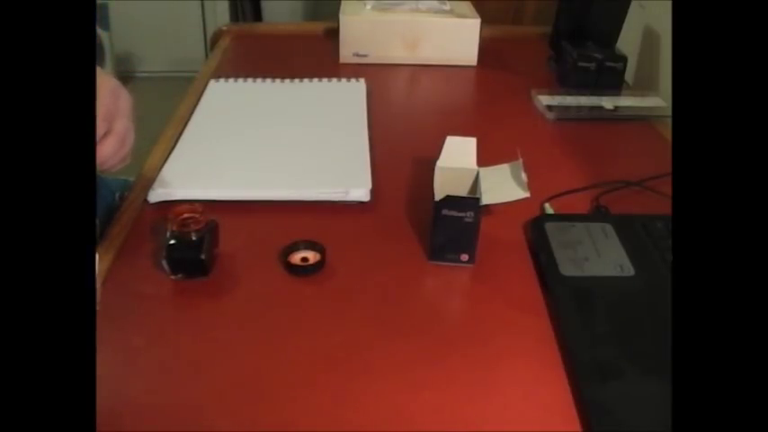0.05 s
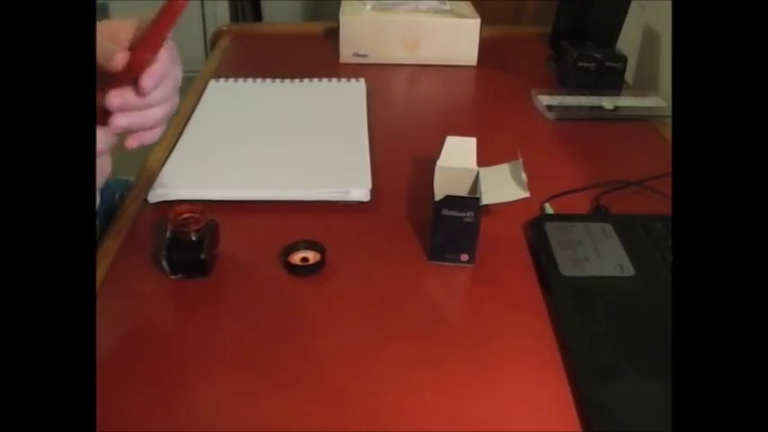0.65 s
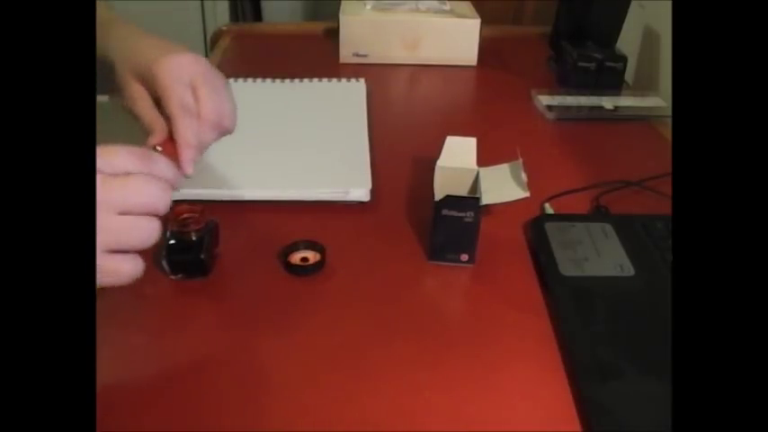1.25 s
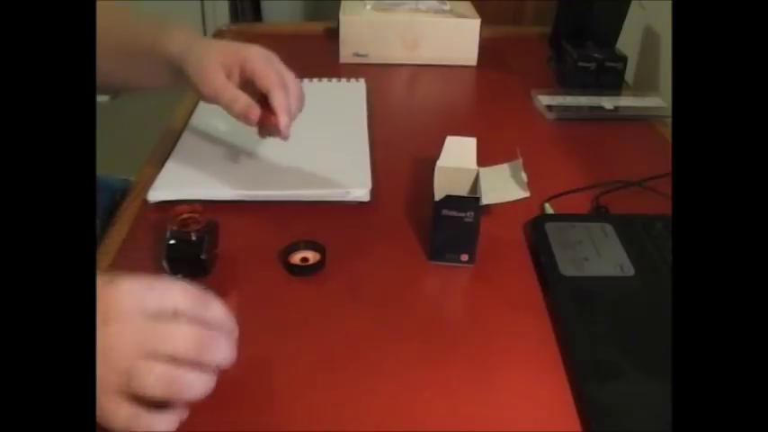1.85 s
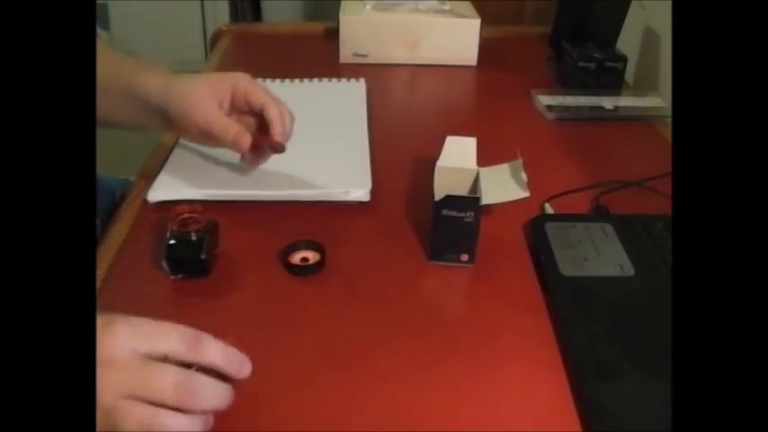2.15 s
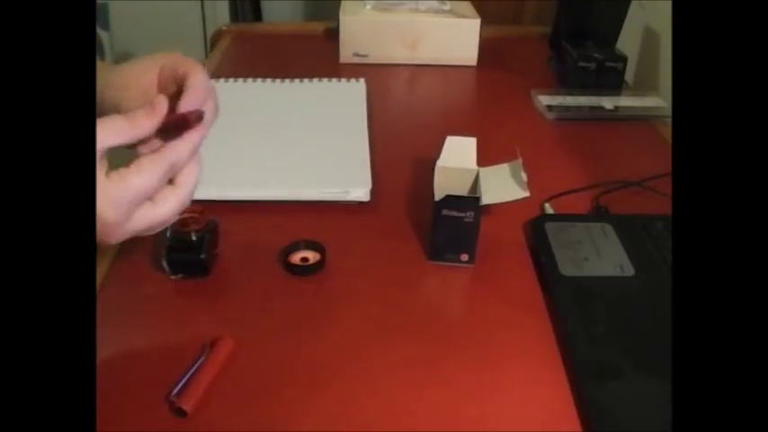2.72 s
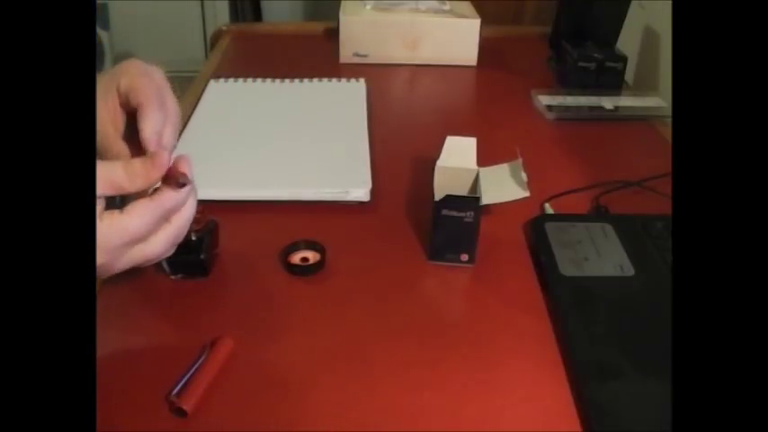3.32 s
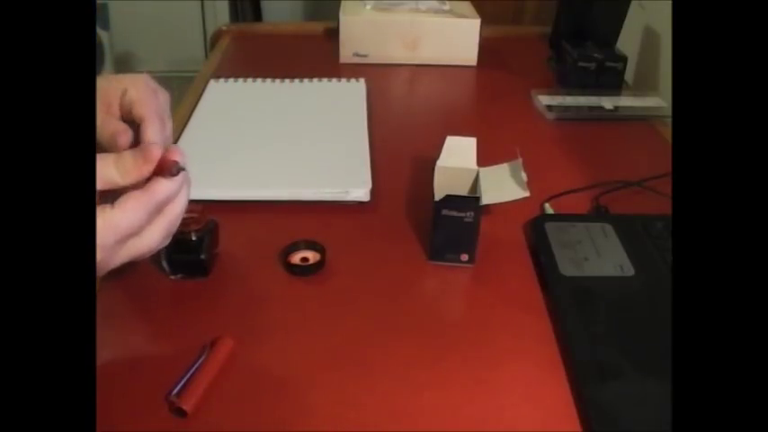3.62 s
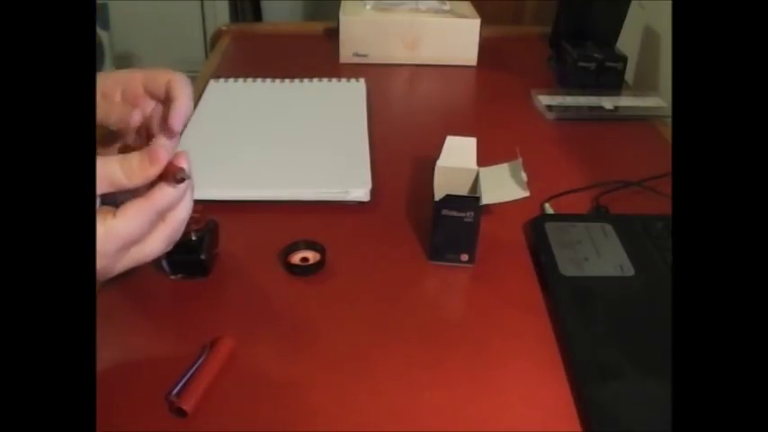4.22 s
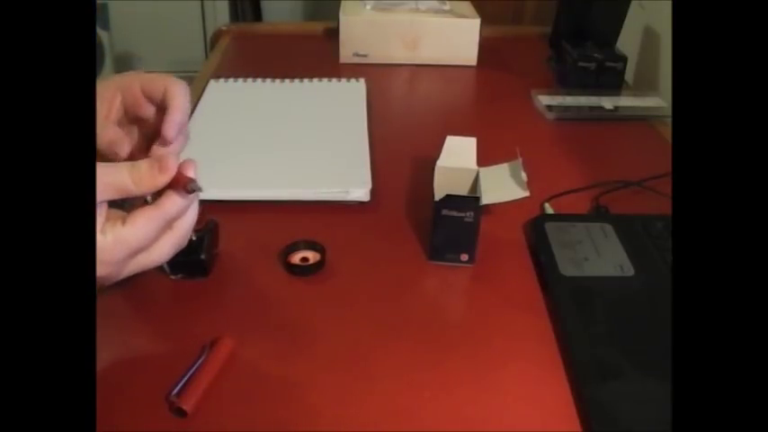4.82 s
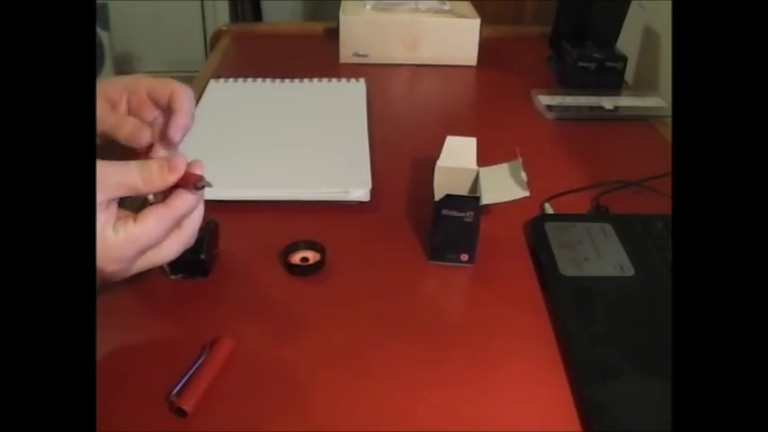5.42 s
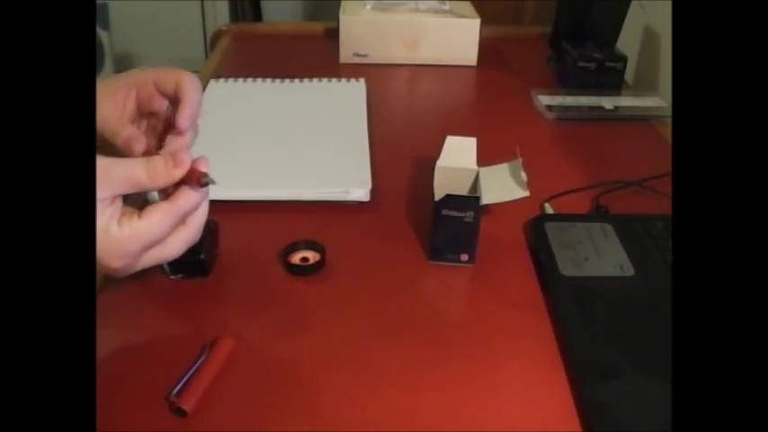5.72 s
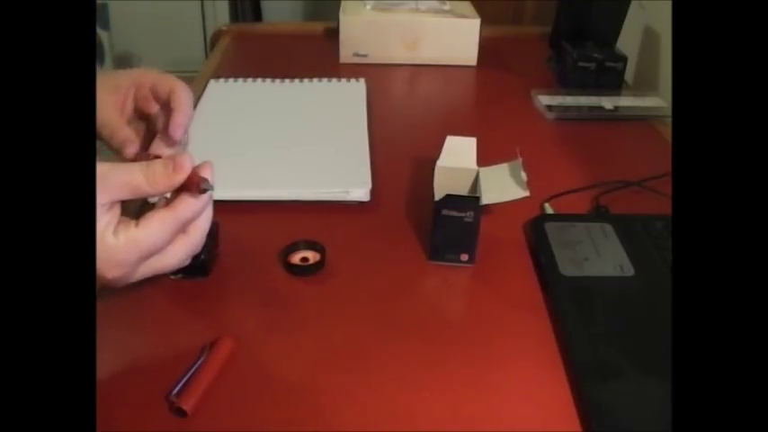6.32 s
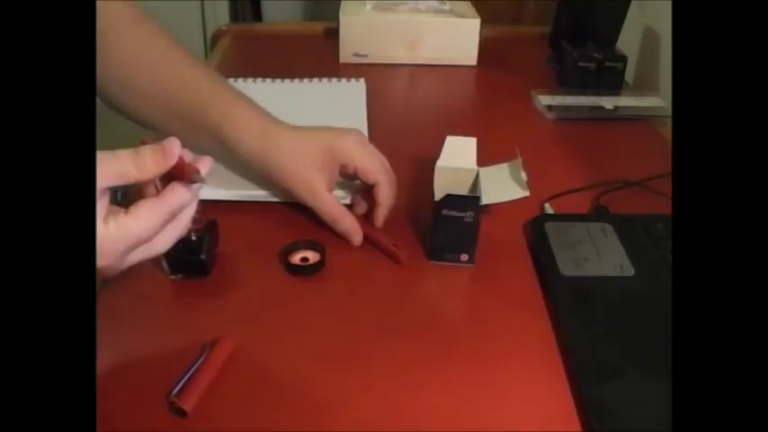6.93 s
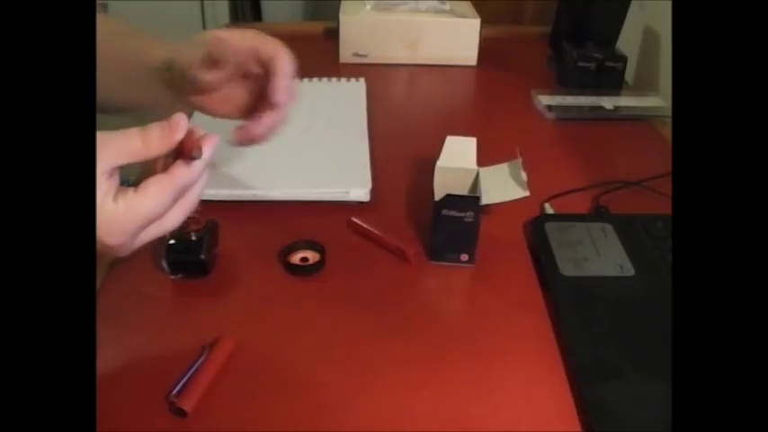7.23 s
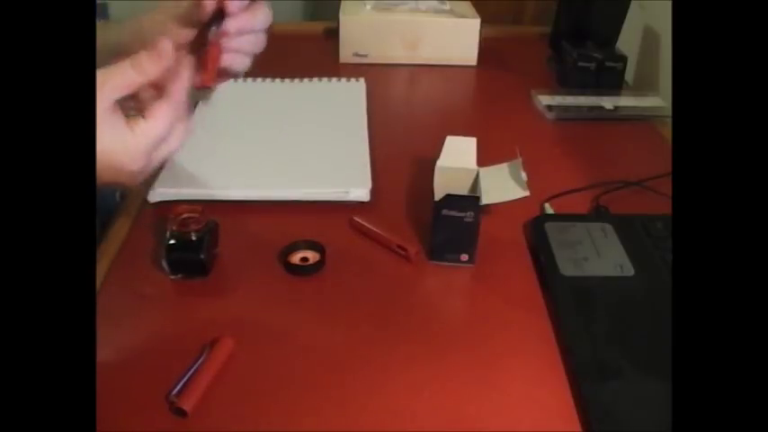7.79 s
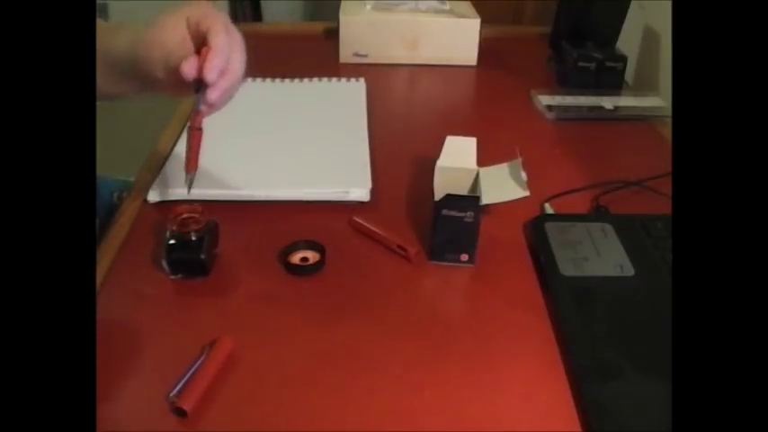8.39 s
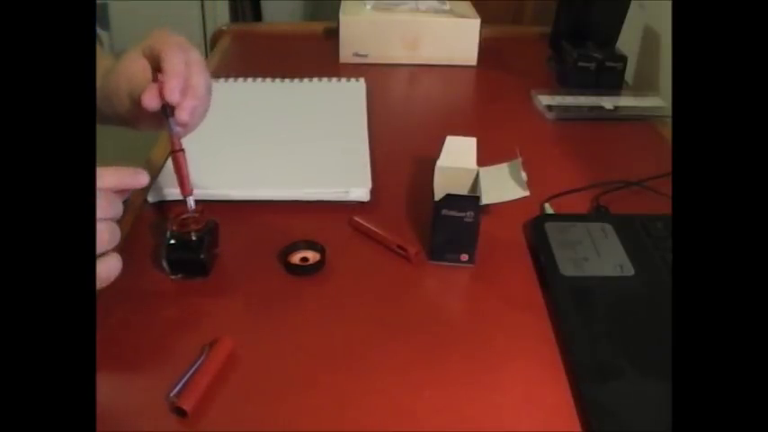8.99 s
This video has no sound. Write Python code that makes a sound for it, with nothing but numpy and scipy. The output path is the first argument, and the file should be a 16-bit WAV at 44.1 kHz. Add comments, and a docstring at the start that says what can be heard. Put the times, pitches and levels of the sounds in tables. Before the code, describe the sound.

Over a humming fan, a plastic pen snaps open, its parts ticking, rasping faintly and knocking down onto a wooden desk.

```python
"""A fan's rushing air and mains hum fill a small, dry room; a fountain pen ticks faintly in the fingers.
Its cap snaps off with a crack and a hollow pop, then clatters onto a wooden desk.
The barrel is unscrewed: the thread sticks and slips, and the filler's small parts tick and ring.
The barrel knocks down on the desk too. Hand and sleeve brush, and fingers and wrist bump the wood."""
import sys
import numpy as np
from scipy import signal
from scipy.fft import rfft, irfft, next_fast_len
from scipy.io import wavfile
from scipy.ndimage import uniform_filter1d

SR = 44100
rng = np.random.default_rng(int(sys.argv[2]) if len(sys.argv) > 2 else 0)


def log_audio(samples):
    """Write samples as a 16-bit WAV file to the path given in sys.argv[1]."""
    # one column per channel
    frames = np.atleast_2d(samples).T
    # limit to full scale, then quantise
    limited = np.clip(frames, -1, 1)
    pcm = np.round(limited * 32767).astype(np.int16)
    wavfile.write(sys.argv[1], SR, pcm)


N = 403495
T = np.arange(N) / SR
RING_T = T[:SR // 2]


def undb(db):
    """Decibels to gain."""
    return 10 ** (np.asarray(db) / 20)


def level(x, db):
    """Scale to an rms level."""
    return x * undb(db) / np.sqrt(np.mean(x ** 2))


def add(track, at_s, sound):
    """Mix a sound in at a time."""
    i = int(at_s * SR)
    track[i:i + len(sound)] += sound[:N - i]


def colour(x, points):
    """Minimum-phase filter through (frequency [Hz], gain [dB]) points."""
    size = next_fast_len(len(x) + 2048) * 2
    hz, db = np.transpose(points)
    log_hz = np.log(np.fft.rfftfreq(size, 1 / SR) + 1)
    log_gain = np.log(undb(np.interp(log_hz, np.log(hz), db)))
    cepstrum = irfft(log_gain)[:size // 2]
    response = np.exp(2 * rfft(cepstrum, size) - cepstrum[0])
    return irfft(rfft(x, size) * response)[:len(x)]


def band(x, hz, width_hz):
    """Steep resonance: a band-pass applied twice."""
    b, a = signal.iirpeak(hz, hz / width_hz, fs=SR)
    return signal.lfilter(b, a, signal.lfilter(b, a, x))


def drift(rate_hz):
    """Slow random curve, spread near 1."""
    step = int(SR / rate_hz)
    return uniform_filter1d(np.repeat(rng.standard_normal(N // step + 1), step), step)[:N]


def ring(modes, pitch=1, order=1):
    """One blow on a body; at order 2 each mode swells briefly first, like air driven by a wall."""
    hz, db, t60_s = np.transpose(modes)[:, :, None]
    decay = np.log(1000) / t60_s
    t = RING_T[:SR // 6]
    envelope = 2 * decay / SR * (decay * t) ** (order - 1) * np.exp(-decay * t)
    return np.sum(undb(db) * envelope * np.cos(2 * np.pi * hz * pitch * t), axis=0)


def crack(decay_ms, spike=0.41):
    """Hard surfaces touch: a spike, then brief pitchless chatter; unit energy."""
    t = RING_T[:1024]
    burst = rng.standard_normal(len(t)) * np.exp(-t / (decay_ms / 1000))
    burst[0] = spike
    power = uniform_filter1d(np.abs(rfft(burst)) ** 2, size=7)
    whitening = np.c_[np.fft.rfftfreq(len(t), 1 / SR) + 1, -10 * np.log10(power)]
    burst = colour(burst, whitening)
    return burst / np.linalg.norm(burst)


# wall reflections: (frequency [Hz], gain [dB])
WALL_EQ = [(100, -5), (250, 6), (295, -1.5), (400, -12), (560, -5), (1000, -6), (1600, -11), (2200, -7.5),
           (4000, -1), (8000, -6), (11500, -6), (16000, -5)]

def diffuse(t60_s, build_s, treble_db, smooth_hz=90):
    """Many weak reflections build up and die away, coloured by the walls."""
    tail = rng.standard_normal(len(RING_T)) * undb(-60 * RING_T / t60_s)
    spectrum = rfft(tail * np.minimum(RING_T / build_s, 1) ** 2, SR)
    power = uniform_filter1d(np.abs(spectrum) ** 2, smooth_hz)
    flat = irfft(spectrum / np.sqrt(power), SR)[:len(RING_T)]
    return colour(colour(flat, WALL_EQ), [(2000, 0), (5000, treble_db)])


def room(x, echoes, wet_db, build_s, t60_s=0.235, left_db=6.5, treble_db=0, side_db=-8):
    """Direct sound with its treble leaning left, echoes off near surfaces and a short diffuse tail."""
    mid, side = (signal.fftconvolve(x, diffuse(t60_s, build_s, treble_db))[:N] for _ in range(2))
    side = undb(side_db) * side
    for delay_s, db in echoes:
        add(mid, delay_s, undb(db) * x)
    direct = np.array([colour(x, [(500, -ear * 0.45), (2500, ear * 0.082), (11000, ear * left_db / 2)])
                       for ear in (1, -1)])
    return direct + undb(wet_db) * np.array([mid + side, mid - side])


# fan air, and further shaping of its side channel: (frequency [Hz], gain [dB])
AIR_EQ = [(100, -55.5), (170, -12), (222, -5), (253, -8.5), (370, -6.5), (718, -3), (775, -3.5), (1320, -6),
          (1480, -9.5), (2120, -11.5), (2870, -28), (7830, -27), (8950, -27), (12800, -25.5),
          (15800, -31.5)]
AIR_SIDE_EQ = [(60, 2), (110, -5), (200, 4.5), (380, 3.5), (700, -1), (1290, -1), (2380, 0.5), (4400, 6),
               (8120, -0.5), (15000, 0)]
# fan housing: (centre [Hz], width [Hz], level [dB], side re mid [dB])
HOUSING_BANDS = [(45, 63, -72, 1), (139, 36, -66.5, -6), (713.3, 26, -71, -3), (4240, 4600, -73.5, 0)]
# motor, mains and electronic tones: (frequency [Hz], level [dB])
HUM_TONES = [(50, -89), (90.3, -58.5), (150, -74), (250, -73), (1223, -76.5), (1354.5, -74), (8000, -86),
             (10800, -84)]

def fan(air_db=-59.5, right_db=0.34, hum_right_db=3.0):
    """Rushing air, a droning housing and slightly unsteady tones, all a little to the right."""
    mid, side = (level(colour(rng.standard_normal(N), AIR_EQ), air_db) for _ in range(2))
    side = colour(side, AIR_SIDE_EQ)
    for hz, width_hz, db, side_db in HOUSING_BANDS:
        mid += level(band(rng.standard_normal(N), hz, width_hz), db)
        side += level(band(rng.standard_normal(N), hz, width_hz), db + side_db)
    hum = np.zeros(N)
    for hz, db in HUM_TONES:
        tone = np.sin(2 * np.pi * hz * T + 0.15 * drift(4))
        hum += level(tone, db) * undb(0.7 * drift(6))
    lean = np.array([[-0.5], [0.5]])
    return np.array([mid + side, mid - side]) * undb(right_db * lean) + hum * undb(hum_right_db * lean)


# hand and sleeve: (start [s], length [s], centre [Hz], level [dB])
SLEEVE_BRUSHES = [(1.66, 0.17, 424, -59), (7.88, 0.4, 464, -57)]

def brushes(relative_width=0.34, flutter_db=3):
    """Skin and cloth rub in soft, uneven swells."""
    out = np.zeros(N)
    for start_s, length_s, hz, db in SLEEVE_BRUSHES:
        swell = np.hanning(int(length_s * SR))
        rub = level(band(rng.standard_normal(SR), hz, hz * relative_width), db)
        add(out, start_s, swell * rub[:len(swell)])
    return out * undb(flutter_db * drift(21))


# wooden desk and hollow pen tube, also struck in knocks(): (frequency [Hz], level [dB], t60 [s])
DESK_MODES = [(134, -8.5, 0.062), (426, 1, 0.049), (497, -1.5, 0.038), (550, 2, 0.054), (618, -11.5, 0.075)]
TUBE_MODES = [(1035, -3, 0.024), (1315, -0.5, 0.0064), (1546, 5.5, 0.0067), (2057, -3.5, 0.018),
              (3900, -32, 0.0016), (6100, -14.5, 0.003)]
# fingers and wrist on the desk: (time [s], level [dB], contact [ms], pen re desk [dB])
HAND_BUMPS = [(6.957, 21, 8.7, -25), (7.003, 9.5, 3.9, -25), (7.12, 13, 3.5, -22), (8.786, -1, 1.35, 1),
              (8.803, 9, 3.5, -11)]

def bumps():
    """Flesh pushes slowly, so mostly the desk's low modes answer; a quicker push also knocks the pen."""
    out = np.zeros(N)
    for at_s, db, contact_ms, pen_db in HAND_BUMPS:
        push = np.hanning(int(contact_ms * SR / 1000) + 3)
        response = ring(DESK_MODES) + undb(pen_db) * ring(TUBE_MODES, order=2)
        add(out, at_s, undb(db) * signal.fftconvolve(push / push.sum(), response))
    return out


# thread rasp and rub through the barrel: (frequency [Hz], gain [dB])
RASP_EQ = [(1000, -9), (5600, -4), (7200, -0.5), (8200, -3), (9200, 1), (10300, 0), (12100, 0.5),
           (14200, -2), (16000, -14)]
RUB_EQ = [(500, -18), (1050, 5.5), (2000, -0.5), (2600, -7), (3150, -2.5), (4200, -19), (16000, -36)]
# barrel turns: (start [s], length [s], rasp [dB], rub [dB], squeak [Hz], squeak [dB])
TURNS = [(3.942, 0.057, -62, -56, 7240, -86), (4.213, 0.12, -62.5, -62, 11800, -68),
         (4.534, 0.057, -64.5, -61, 8800, -73), (4.866, 0.078, -65, -67, 12400, -73),
         (5.797, 0.074, -66.5, -66, 9000, -81), (6.086, 0.19, -67.5, -70, 11800, -81),
         (6.3, 0.236, -66, -65, 10500, -72), (6.411, 0.032, -64, -72, 9200, -62),
         (6.948, 0.08, -68, -72, 13000, -77)]

def scrapes(slips_per_s=380, spread_db=4, squeak_width_hz=2600):
    """The thread sticks and slips in uneven grains: a crisp rasp, a hollow rub and a squeak."""
    out = np.zeros(N)
    n = len(RING_T)
    for start_s, length_s, rasp_db, rub_db, squeak_hz, squeak_db in TURNS:
        pressure = signal.windows.tukey(int(length_s * SR))
        slips = rng.random(n) < slips_per_s / SR
        sizes = rng.choice([-1, 1], n) * undb(spread_db * rng.standard_normal(n))
        grains = (slips * sizes)[:len(pressure)]
        rasp = level(colour(grains, RASP_EQ), rasp_db)
        rub = level(colour(grains, RUB_EQ), rub_db)
        squeak = level(band(grains, squeak_hz, squeak_width_hz), squeak_db)
        add(out, start_s, pressure * (rasp + rub + squeak))
    return out


# filler parts: (frequency [Hz], level [dB], t60 [s])
FILLER_MODES = [(1110, -1, 0.019), (2310, -2, 0.018), (3090, -7, 0.02), (5100, -1, 0.018),
                (7040, 2.5, 0.017), (9030, -1, 0.016), (10850, 1, 0.015), (12140, -0.5, 0.011)]
# tiny contacts through the plastic body: (frequency [Hz], gain [dB])
CHATTER_EQ = [(400, -14), (1120, 6.5), (1550, 1.5), (2250, 3.5), (2750, -4.5), (3250, 1), (4000, -4.5),
              (5000, -3.5), (6000, -4), (7100, -2.5), (8200, -3.5), (9300, -8), (12200, -1.5), (14000, -10),
              (16000, -18)]
# filler catches: (time [s], click [dB], ping [Hz], ping [dB], click tilt [dB/octave])
FILLER_TICKS = [(0.0954, -48, 1910, -15, -6), (0.4956, -46.5, 9550, -19, 1.5),
                (0.558, -48, 12200, -34, -0.5), (1.712, -43, 2200, -23, -2), (2.5127, -34.5, 1900, -5, 2),
                (3.8701, -49, 11600, -35, 2), (3.899, -54, 12000, -24, 7), (3.971, -51, 3200, -27, -2),
                (4.244, -39.5, 7100, -20, -3), (4.26, -35, 9500, -12, 2), (4.2805, -39, 12800, -16, 5),
                (4.2889, -36.5, 7340, -12, 2), (4.316, -50, 7100, -20, 0), (4.518, -38.5, 12500, -9, 0),
                (4.8358, -35, 2280, -15, 5.5), (4.895, -43, 1130, -12, -2), (4.9184, -42, 7000, -24, 2),
                (4.963, -53, 7100, -22, -3), (5.1464, -30, 3270, -11, 0), (5.16, -46, 4970, -22, 4),
                (5.2295, -51, 3280, -24, 4), (5.7354, -52, 3200, -23, -1), (5.8194, -41, 3210, -19, 0),
                (5.917, -50, 8900, -33, 4), (6.0764, -37, 11600, -20, 0), (6.209, -34.5, 9200, -24, 0),
                (6.232, -40, 10000, -20, -2), (6.2776, -28.5, 11500, -1.5, 2), (6.344, -47, 2930, -17, -5),
                (6.3812, -38, 3020, -10.5, 2), (6.467, -34, 3090, -7, 2.5), (6.955, -47, 3430, -23, -4),
                (7.007, -30.5, 9100, -17, -2), (7.552, -41.5, 2300, -27, -2.5)]

def ticks(click_gain_db=13, ping_t60_s=0.012, settle_range_s=(0.012, 0.027), settle_db=-17.5):
    """Small, stiff parts click, then settle more faintly; the contact point picks a resonance to ping."""
    out = np.zeros(N)
    for at_s, db, ping_hz, ping_db, tilt in FILLER_TICKS:
        settle_s = at_s + rng.uniform(*settle_range_s)
        for click_s, drop_db in (at_s, 0), (settle_s, settle_db):
            click = ring(FILLER_MODES, pitch=rng.uniform(0.97, 1.03))  # shifting grip detunes
            add(click, 0, colour(crack(decay_ms=3.4), CHATTER_EQ))
            click = colour(click, [(1000, -2 * tilt), (16000, 2 * tilt)])
            add(out, click_s, undb(db + click_gain_db + drop_db) * click)
        add(out, at_s, undb(ping_db) * ring([(ping_hz, 0, ping_t60_s)]))
    return out


# plastic shell: (frequency [Hz], level [dB], t60 [s])
SHELL_MODES = [(2300, 2.5, 0.0066), (3000, -6, 0.006), (3650, 0, 0.0041), (4200, -7, 0.0042),
               (5850, -3.5, 0.0063)]
# pen-on-desk crack: (frequency [Hz], gain [dB])
CONTACT_EQ = [(200, -30), (1500, -3.5), (2800, -9), (5200, -7), (6700, -1), (7700, -8), (9300, -2.5),
              (12000, -8.5), (14000, -14), (16000, -17)]
# cap, then barrel, on the desk:
# (time [s], desk [dB], desk pitch [ratio], tube [dB], tube pitch [ratio], crack [dB], shell [dB])
LANDINGS = [(2.0695, -1, 1.17, -1, 1.06, -8.5, -16), (2.0711, 13, 0.96, 0.5, 1.01, -6, -12.5),
            (2.166, -5.5, 1.06, -7, 1.12, -25.5, -21), (2.2133, 16, 0.99, -4, 1.08, -3, 2),
            (2.3082, -16, 1.06, -28, 1.07, -40, -27.5), (7.1167, 1, 1.0, 9.5, 1.02, 3, -6.5),
            (7.1187, 15.5, 0.97, 10.5, 0.775, -20, -18)]

def knocks():
    """Each landing cracks, pops the hollow pen part, clacks its plastic shell and shakes the desk."""
    body, contact = np.zeros((2, N))
    for at_s, desk_db, desk_pitch, tube_db, tube_pitch, crack_db, shell_db in LANDINGS:
        tube = undb(tube_db) * ring(TUBE_MODES, pitch=tube_pitch, order=2)
        desk = undb(desk_db) * ring(DESK_MODES, pitch=desk_pitch)
        shell = undb(shell_db) * ring(SHELL_MODES)
        add(body, at_s, tube - desk + shell)
        add(contact, at_s, undb(crack_db) * crack(decay_ms=0.94))
    return body + colour(contact, CONTACT_EQ)


# air in the cap, and the hand: (frequency [Hz], level [dB], t60 [s])
CAP_AIR_MODES = [(990, -1.8, 0.005), (1400, 0.94, 0.0092), (1990, -2.7, 0.018)]
HAND_MODES = [(167, -17, 0.08), (410, -4.5, 0.029), (454, -6.5, 0.024)]
# cap lip scraping over its catch: (frequency [Hz], gain [dB])
LIP_EQ = [(400, -14), (1200, -8.5), (2000, 5), (2750, -4), (4200, -4), (5200, -3.5), (6500, -0.5),
          (7800, -3), (9200, -3.5), (11700, -6.5), (14000, -7), (16000, -23)]
# recoil into the hand: (time [s], level [dB], pitch [ratio])
HAND_JOLTS = [(1.528, 10, 0.9), (3.4877, 5, 1.06)]
# the cap slips twice, then the thread: (time [s], pop [dB], pop pitch [ratio], crack [dB], zing [dB])
FIT_SNAPS = [(1.5325, 4, 1.08, -15, -24), (1.5348, 6, 1.35, -7.5, -23), (1.5768, -3, 1.3, -19, -20),
             (1.5785, 10, 0.99, -3.5, 3), (1.5823, -1.5, 1.22, -5.5, -5), (3.4854, -13, 0.69, -28, -13),
             (3.4883, -14, 0.68, -14, -13)]

def snaps(pop_band_hz=(830, 2040), jolt_crack_db=-29.5):
    """A tight fit slips and catches: the lip cracks, the air inside pops and the hand thuds."""
    pop, thud, contact = np.zeros((3, N))
    for at_s, pop_db, pitch, crack_db, _ in FIT_SNAPS:
        add(pop, at_s, undb(pop_db) * ring(CAP_AIR_MODES, pitch=pitch))
        add(contact, at_s, undb(crack_db) * crack(decay_ms=2.7))
    for at_s, db, pitch in HAND_JOLTS:
        add(thud, at_s, -undb(db) * ring(HAND_MODES, pitch=pitch))
        add(contact, at_s, undb(db + jolt_crack_db) * crack(decay_ms=13))
    tube_radiation = signal.butter(4, pop_band_hz, "band", fs=SR, output="sos")
    return signal.sosfilt(tube_radiation, pop) + thud + colour(contact, LIP_EQ)


# thin rim: (frequency [Hz], level [dB], t60 [s])
RIM_MODES = [(4930, -18, 0.0071), (7100, -15, 0.0061), (8860, -3, 0.0037), (13300, -1, 0.0022)]

def zings():
    """The thin rim rings for an instant at each snap."""
    out = np.zeros(N)
    for at_s, *_, zing_db in FIT_SNAPS:
        add(out, at_s, undb(zing_db) * ring(RIM_MODES, order=2))
    return out


# surfaces nearest the desk, cap and hands: (delay [s], level [dB])
NEAR_DESK = [(.0095, -22), (.019, -27)]
NEAR_CAP = [(.0097, -9.5), (.014, -17)]
NEAR_HANDS = [(.0095, -13.5)]

def scene():
    """The desk lies in front; the hands work above it, to the left; the fan runs throughout."""
    # boxed in by things on the desk: shorter tail
    on_desk = room(knocks() + bumps(), NEAR_DESK, wet_db=2.5, build_s=0.0022,
                   t60_s=0.16, left_db=6, treble_db=-5)
    # clear of any surface: slower build
    cap = room(snaps() + brushes(), NEAR_CAP, wet_db=-2.5, build_s=0.008, treble_db=-0.5)
    rim = room(zings(), NEAR_CAP, wet_db=-11, build_s=0.008)  # beamed, so nearly dry
    in_hand = room(ticks() + scrapes(), NEAR_HANDS, wet_db=-1.5, build_s=0.00057, side_db=-1.5)
    return fan() + in_hand + on_desk + cap + rim


def record(dry):
    """Cut the deepest rumble and the top treble."""
    low_hz, top_hz = 35, 16200
    highpass = signal.butter(2, low_hz, "high", fs=SR, output="sos")
    lowpass = signal.ellip(8, 0.2, 70, top_hz, fs=SR, output="sos")
    return signal.sosfilt(lowpass, signal.sosfilt(highpass, dry))


dry = scene()
out = record(dry)
log_audio(out)
```